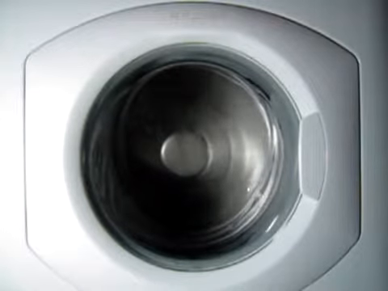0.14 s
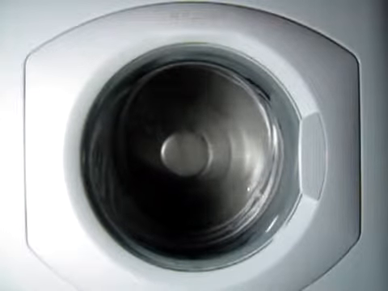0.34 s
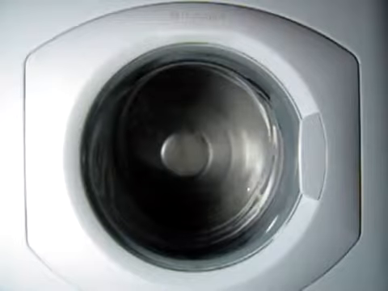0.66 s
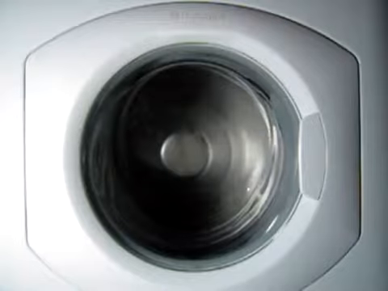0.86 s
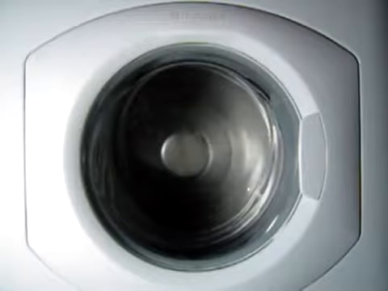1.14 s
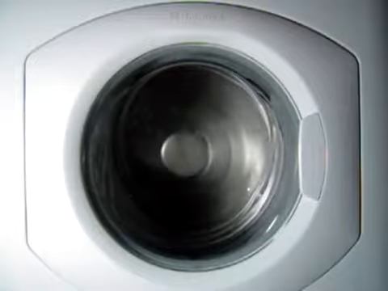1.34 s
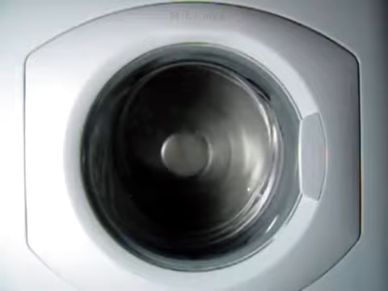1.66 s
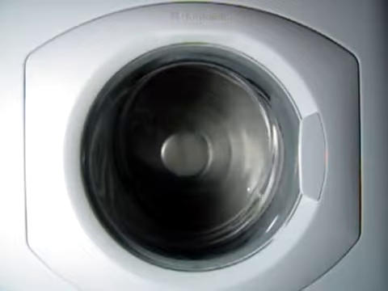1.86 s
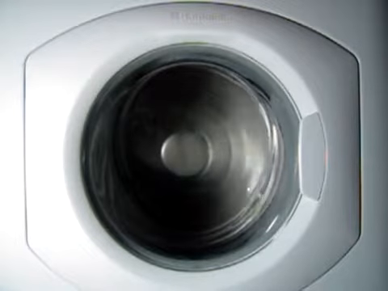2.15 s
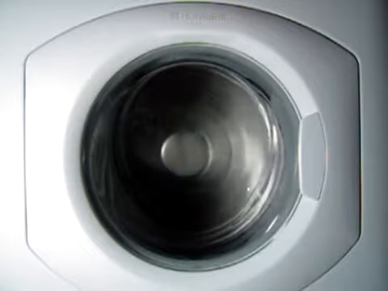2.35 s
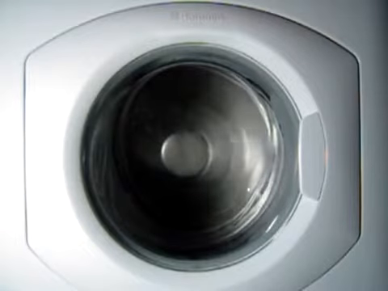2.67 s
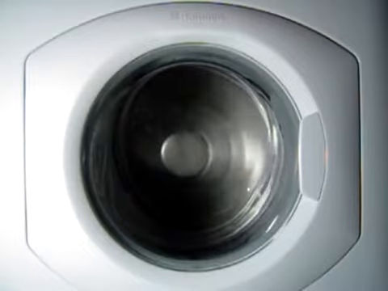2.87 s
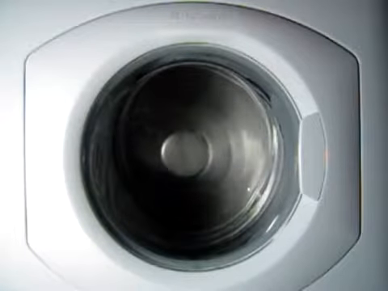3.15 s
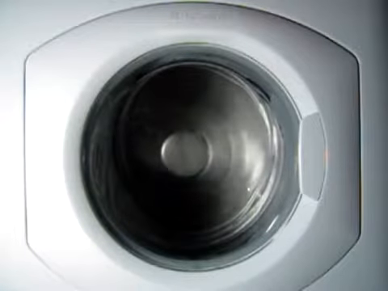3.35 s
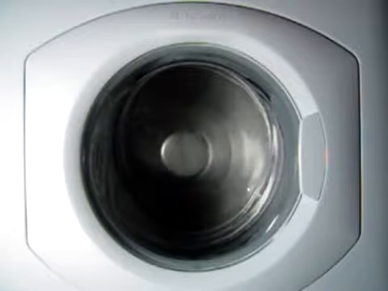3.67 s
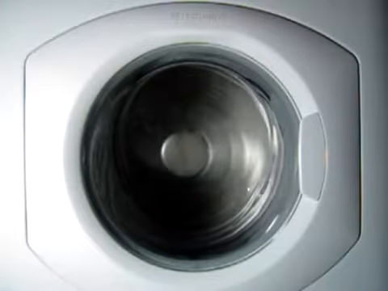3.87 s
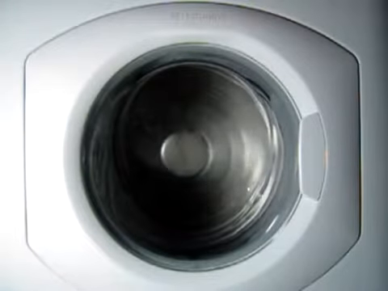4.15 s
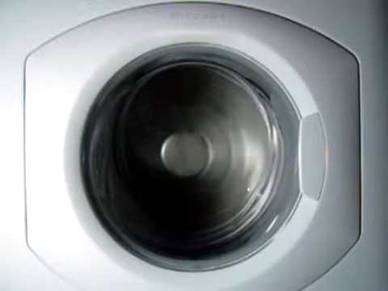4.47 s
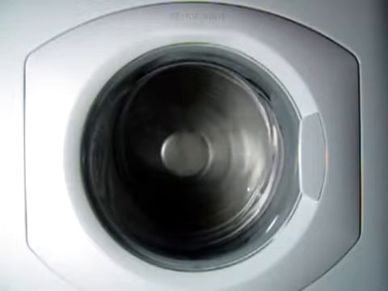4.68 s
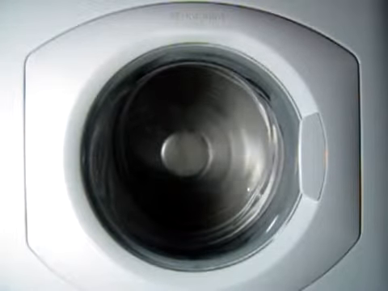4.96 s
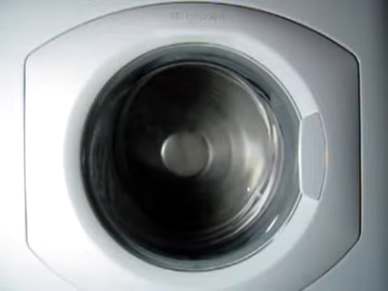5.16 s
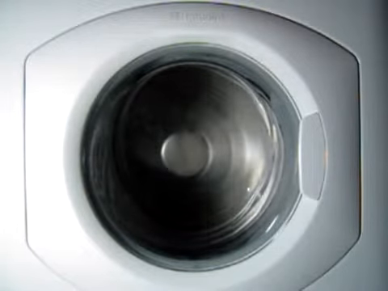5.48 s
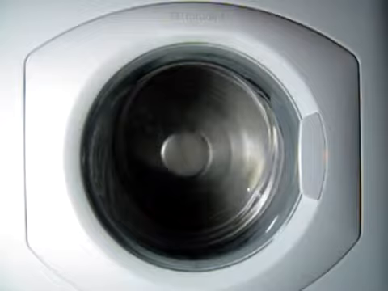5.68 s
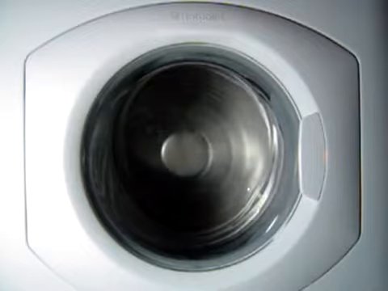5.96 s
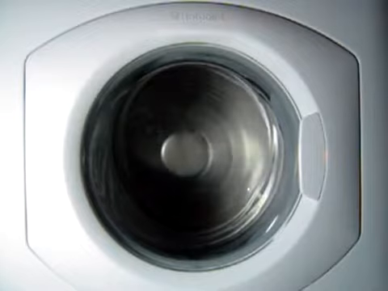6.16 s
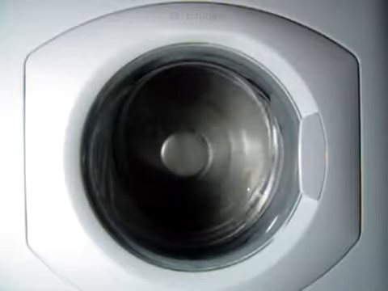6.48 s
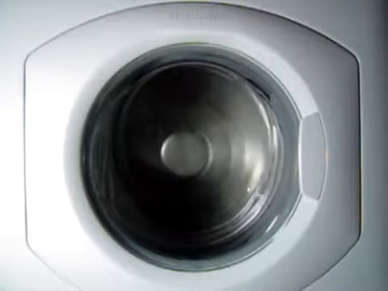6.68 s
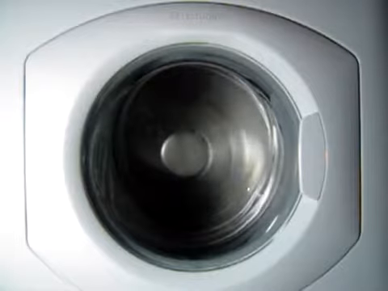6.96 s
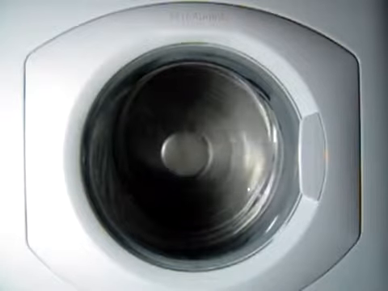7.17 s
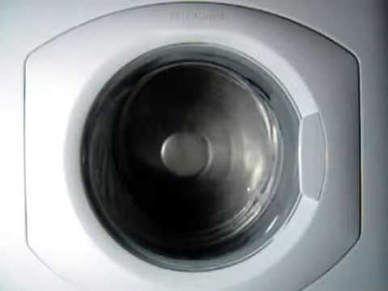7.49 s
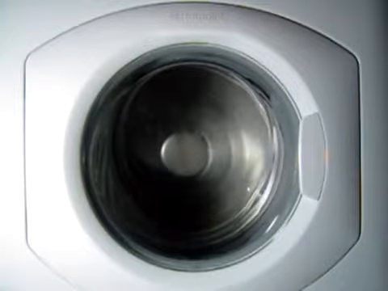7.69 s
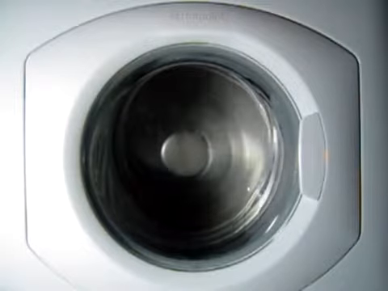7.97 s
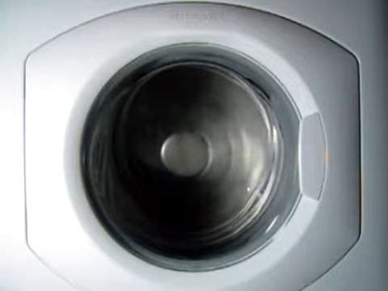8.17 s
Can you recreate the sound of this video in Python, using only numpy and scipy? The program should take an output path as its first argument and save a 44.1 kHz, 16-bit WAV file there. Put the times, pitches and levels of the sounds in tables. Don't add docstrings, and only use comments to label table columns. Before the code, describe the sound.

Continuous mechanical drone from a washer in fast spin, already running at the beginning and still running at the end. Motor, belt and drum tones rise together very gradually, some swelling and fading as the metal cabinet resonates. Broadband rolling noise and soft hiss surround them, over a faint low room hum. Close single microphone, little echo.

```python
import sys
import numpy as np
from scipy import signal
from scipy.fft import rfft, irfft, next_fast_len
from scipy.io import wavfile
from scipy.ndimage import uniform_filter1d, map_coordinates

SR = 44100
rng = np.random.default_rng(int(sys.argv[2]) if len(sys.argv) > 2 else 0)


def unload_wav(signal):
    wavfile.write(
        sys.argv[1],
        SR,
        np.round(np.clip(np.atleast_2d(signal).T, -1, 1) * 32767).astype(np.int16),
    )


def nominal_scale(level):
    x = np.asarray(level, float) / 20
    return 10 ** x


N = 366912

FIRST, LAST = 10, 360
MOTOR_RATIO, BELT_RATIO = 16.305, 1.4478
HUM_DRUM, HUM_BELT = 29, 20


def unit(x):
    return x / np.sqrt(np.mean(x ** 2) + 1e-20)


def along(points, hz):
    f, v = np.transpose(points)
    return np.interp(np.log(hz + 1), np.log(f + 1), v)


def curves(rows):
    s, *cols = np.transpose(rows)
    return [np.interp(np.arange(N) / SR, s, c) for c in cols]


def wobble(rate):
    t = np.arange(0, N + 64, 64) / SR
    knots = rng.standard_normal(int(N * rate / SR) + 4)
    coarse = map_coordinates(knots, [t * rate])
    return np.interp(np.arange(N) / SR, t, coarse)


def filtered(x, response):
    m = next_fast_len(N + SR // 2)
    return irfft(rfft(x, m) * response(np.fft.rfftfreq(m, 1 / SR)), m)[:N]


def patchy(depth_db, hole_db=0):
    z = signal.stft(rng.standard_normal(N + 256), nperseg=256)[2]
    field = uniform_filter1d(rng.standard_normal(z.shape), size=5, axis=0)
    field = unit(uniform_filter1d(field, size=4, axis=1))
    holes = np.clip(-field - 2, 0, 1)
    z = z * nominal_scale(depth_db * field - hole_db * holes)
    return unit(signal.istft(z, nperseg=256)[1][:N])


def orders(turns, table, unsteady_db):
    total = 0
    for k, db in table:
        gain = np.sqrt(2) * nominal_scale(db + unsteady_db * wobble(1.55))
        total = total + gain * np.sin(2 * np.pi * (k * turns + rng.random()))
    return total


def each_turn(lines, turns):
    size = 2 * (len(lines) - 1)
    wave = irfft(lines) * size / np.sqrt(2)
    return map_coordinates(wave, [turns % 1 * size], order=1, mode="grid-wrap")


# (multiple of drum speed, level [dB])
DRUM_SHAKE = [(10, -13), (46, -12), (62, -3), (80, -7), (93, -4), (115, -10), (172, -14), (200, -9)]
# (multiple of drum speed, level [dB])
STANDOUT_MULTIPLES = [(11, -5), (21, -5), (26, 0), (27, -3), (28, -14), (93, -2), (35, -4), (50, -3),
                      (57, -2), (61, 2), (65, -3), (66, 1), (67, 2), (68, -11), (69, -5), (72, -1),
                      (80, -16), (84, -3), (87, -3), (88, -16), (90, -1), (95, -11), (96, 0), (97, -1),
                      (98, -8), (99, 0), (124, -3), (133, -2), (143, -1), (161, -4)]
SINGING_MULTIPLES = [13, 86, 85, 94, 105, 108, 111, 112, 116, 119, 134, 136, 139, 140, 141, 142, 144, 148,
                     151, 155, 157, 163, 186, 187, 188, 191, 192, 193, 241, 253]
WEAK_MULTIPLES = [24, 25, 32, 43, 47, 51, 52, 53, 70, 71, 78, 79, 81, 82, 89, 101, 102, 121]
CANCELLED_MULTIPLES = [10, 14, 15, 16, 17, 18, 44, 48, 59, 123, 126, 135, 149, 168, 178]
# (multiple of belt rate, level [dB])
BELT_TUG = [(1, -19), (6, -15), (30, -19)]


def drum(turns, scatter, unsteady_db):
    multiple = np.arange(FIRST, LAST)
    count = LAST - FIRST
    level_db = along(DRUM_SHAKE, multiple) + 2 * rng.standard_normal(count)
    for group, db in ((SINGING_MULTIPLES, -3.5), (WEAK_MULTIPLES, -9), (CANCELLED_MULTIPLES, -16)):
        level_db[np.array(group) - FIRST] = db
    level_db[HUM_DRUM - FIRST] = -60
    strong, strong_db = np.transpose(STANDOUT_MULTIPLES)
    level_db[strong.astype(int) - FIRST] = strong_db

    place = np.where(multiple < 78, .77, .15)
    throbs = np.take([0, 1.2, 0], multiple % 3) - 2 * np.pi * multiple * place
    throbs += scatter * np.cumsum(rng.standard_normal(count))
    phases = 2 * np.pi * rng.random((4, count))
    phases[0] = np.where((multiple > 58) & (multiple < 104), throbs, phases[0])

    played = []
    for phase in phases:
        lines = np.pad(nominal_scale(level_db) * np.exp(1j * phase), (FIRST, 2 ** 14 + 1 - LAST))
        played.append(each_turn(lines, turns))
    steady, slow, fast, tugged = played
    side_lines = orders(BELT_RATIO * turns, BELT_TUG, unsteady_db=0.5) * tugged
    drift = wobble(1.485) * slow + wobble(2.97) * fast
    return steady + side_lines + nominal_scale(unsteady_db) * drift


# (multiple of shaft speed, level [dB])
MOTOR_ORDERS = [(1, -2.6), (2, -0.0), (4, 3.9), (5, -10.7), (6, 4.0), (8, 1.9), (9, -8.3), (10, -6),
                (11, -1.2), (12, -5.8), (14, -4.5), (15, -10), (16, -5), (18, -8)]


def motor(turns):
    return orders(MOTOR_RATIO * turns, MOTOR_ORDERS, unsteady_db=.8)


# (multiple of belt rate, level [dB])
BELT_ORDERS = [(6, -8), (8, -14), (12, -16), (13, -6.5), (16, -6.5), (19, -8.5), (21, -14), (24, -4.5),
               (26, -9), (30, -3), (32, -10), (34, -9), (42, -7), (48, -6), (54, -9), (60, -.5), (66, -3),
               (108, -12), (126, -13)]
# (multiple of belt rate, added multiple of drum speed, level [dB])
BELT_DRUM_BEATS = [(4, 27, -3), (6, 35, -9.5), (10, 31, -10.5), (34, 1, -7), (6, 105, -11.5),
                   (19, 113, -11.5), (6, 152, -12.5), (6, 155, -11), (6, 157, -9)]


def belt(turns):
    table = [(BELT_RATIO * k, db) for k, db in BELT_ORDERS]
    table += [(BELT_RATIO * k + m, db) for k, m, db in BELT_DRUM_BEATS]
    return orders(turns, table, unsteady_db=1.6)


def belt_seam(turns, level_db, scatter_db):
    count = 2 ** 13 + 1
    level = nominal_scale(level_db + scatter_db * rng.standard_normal(count))
    lines = level * np.exp(2j * np.pi * rng.random(count))
    lines[:FIRST] = 0
    lines[LAST // 2:] = 0
    lines[HUM_BELT] = 0
    return each_turn(lines, turns)


def low_hum(turns):
    swell_s = 5.3
    since = turns - turns[round(swell_s * SR)]
    pair = ((HUM_DRUM, -3), (HUM_BELT * BELT_RATIO, -15))  # (multiple of drum speed, dB)
    return sum(np.sqrt(2) * nominal_scale(db) * np.sin(2 * np.pi * k * since) for k, db in pair)


# (frequency [Hz], level [dB per Hz])
ROLLING_FORCE = [(85, -31.5), (110, -26.5), (160, -28.5), (220, -14), (300, -27.5), (400, -17.5),
                 (520, -18.5), (700, -29), (950, -21), (1200, -18.5), (1800, -20), (2600, -18),
                 (3300, -17.5), (4200, -18)]
# (time [s], rolling noise change [dB], hiss level [dB])
MACHINE_EFFORT = [
    (0.1, 2, -46.5),
    (0.19, 1, -46.5),
    (7.7, 3, -45.5),
    (8.2, 2, -45.5),
]


def rolling():
    force = filtered(patchy(depth_db=0.3), lambda hz: nominal_scale(along(ROLLING_FORCE, hz)))
    return nominal_scale(curves(MACHINE_EFFORT)[0]) * np.sqrt(SR / 2) * force


# (frequency [Hz], width [Hz], level [dB])
BASE_MODES = [(86.7, 4.6, -48.9), (108.6, 3.0, -44.7), (112.1, 25.7, -48.7), (134.1, 9.2, -50.1),
              (150, 20, -58), (168.5, 28.6, -49.3), (196.0, 18.6, -52.5), (229.0, 28.4, -50.5),
              (244.9, 12.2, -47.9), (280.0, 12.4, -37.6), (287.8, 5.8, -27.7), (296.8, 12.7, -27.3),
              (313.8, 5.2, -44.8)]
# (frequency [Hz], width [Hz], level [dB])
PANEL_MODES = [(386.2, 41.8, -35.5), (420.4, 11.7, -40.9), (482.0, 32.4, -35.0), (519.7, 35.2, -33.5),
               (577.8, 35.0, -35.8), (662.5, 43.9, -30.0), (672.5, 26.0, -26.4), (688.8, 6.0, -34.9),
               (710.8, 53.1, -31.0), (786.7, 12.5, -32.9), (821.7, 24.0, -33.2), (850.3, 39.5, -31.7),
               (889.9, 44.3, -29.2), (932.5, 23.1, -30.5), (963.8, 25.4, -29.8), (992.4, 22.2, -30.3),
               (1071.5, 114.3, -41.2), (1123.0, 14.3, -41.6), (1200.3, 48.2, -40.4), (1238.4, 14.1, -46.2),
               (1325.0, 65.7, -40.3), (1439.7, 98.8, -44.5), (1626.5, 95.2, -43.0), (1744.8, 83.0, -49.8),
               (1847.8, 36.4, -45.4)]
# (frequency [Hz], width [Hz], level [dB])
DOOR_MODES = [(1918.5, 94.6, -50.9), (2021, 25, -57), (2044.1, 123.4, -55.1), (2155.0, 200.0, -56.5),
              (2316.8, 200.0, -55.0), (2434.1, 90.7, -55.8), (2530, 160, -58), (2551, 45, -51.5),
              (2744.8, 200.0, -56.3), (2966.7, 200.0, -58.8), (3171.9, 200.0, -60.5),
              (3314.6, 152.1, -62.4), (3508.4, 200.0, -60.1), (3723.1, 200.0, -60.0), (3736, 40, -62),
              (3899.0, 200.0, -63.6), (4065.8, 200.0, -66.2), (4219.0, 123.4, -70.2)]


def cabinet(hz):
    power = 0
    for centre, width, db in [*BASE_MODES, *PANEL_MODES, *DOOR_MODES]:
        power = power + nominal_scale(2 * db) / (1 + (2 * (hz - centre) / width) ** 2) ** 2
    return np.sqrt(power)


def machine():
    t = np.arange(N) / SR
    speed_hz = 9.5815 + .1108 * t + .00023 * t ** 2
    turns = np.cumsum(speed_hz) / SR
    shake = drum(turns, scatter=.65, unsteady_db=-20)
    shake += motor(turns) + belt(turns)
    shake += belt_seam(BELT_RATIO * turns, level_db=-17, scatter_db=3) + low_hum(turns)
    return nominal_scale(-0.01) * filtered(shake + rolling(), cabinet)


def walls(hz, depth_db, spacing_hz):
    ripple = map_coordinates(rng.standard_normal(1000), [hz / spacing_hz], mode="wrap")
    return nominal_scale(depth_db * ripple)


# (frequency [Hz], level [dB per Hz])
HISS_SPECTRUM = [(2410, -35), (4100, -1.5), (7590, -6), (8950, -7), (9640, -3), (10000, -4.5), (13100, -39),
                 (22000, -120)]


def hiss():
    def response(hz):
        return nominal_scale(along(HISS_SPECTRUM, hz)) * walls(hz, depth_db=1.0, spacing_hz=21.7)

    noise = unit(filtered(patchy(depth_db=1.0, hole_db=25), response))
    return nominal_scale(curves(MACHINE_EFFORT)[1] + 0.5 * wobble(9)) * noise


# (frequency [Hz], level [dB rms])
DRIVE_WHISTLE = [(7913, -70)]


def whistle():
    t = np.arange(N) / SR
    total = 0
    for hz, db in DRIVE_WHISTLE:
        gain = np.sqrt(2) * nominal_scale(db - 0.5 + 2.5 * wobble(3))
        total = total + gain * np.sin(2 * np.pi * hz * t + 1.2 * wobble(12))
    return total


# (frequency [Hz], level [dB per Hz])
HUM_SPECTRUM = [(12, -48), (20, -15), (54, -15), (75, -5.5), (98, -29), (160, -120)]


def room_hum():
    noise = rng.standard_normal(N)
    return nominal_scale(-63) * unit(filtered(noise, lambda hz: nominal_scale(along(HUM_SPECTRUM, hz))))


def scene():
    return (machine() + hiss() + whistle() + room_hum())[None]


def low_pass(x):
    return signal.sosfilt(signal.butter(12, 10440, fs=SR, output="sos"), x)


def record(dry):
    mix = filtered(dry[0], lambda hz: nominal_scale(-np.clip(hz - 10030, 0, 300) * .3))[None]
    return low_pass(mix)


dry = scene()
out = record(dry)
unload_wav(out)
```